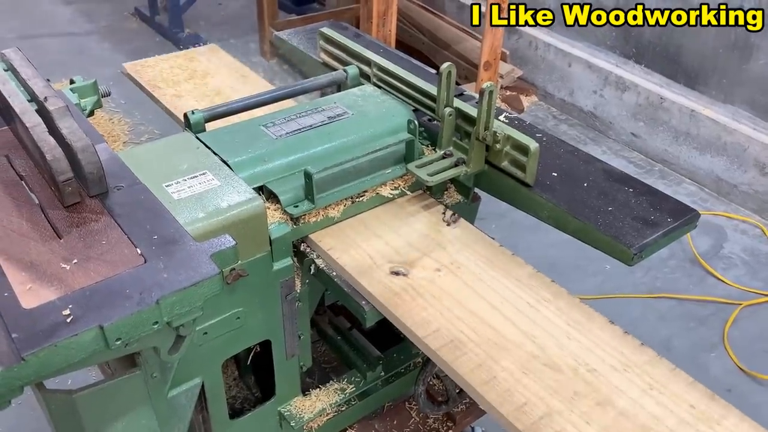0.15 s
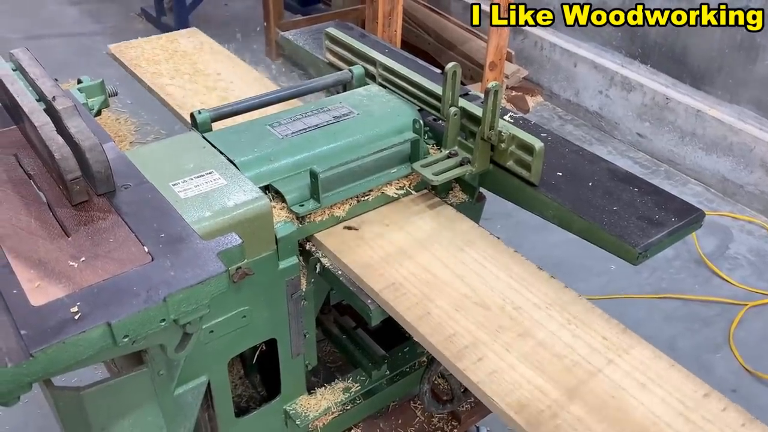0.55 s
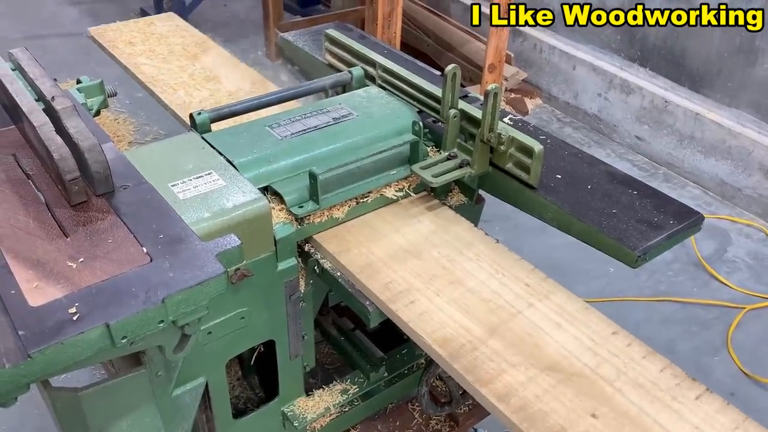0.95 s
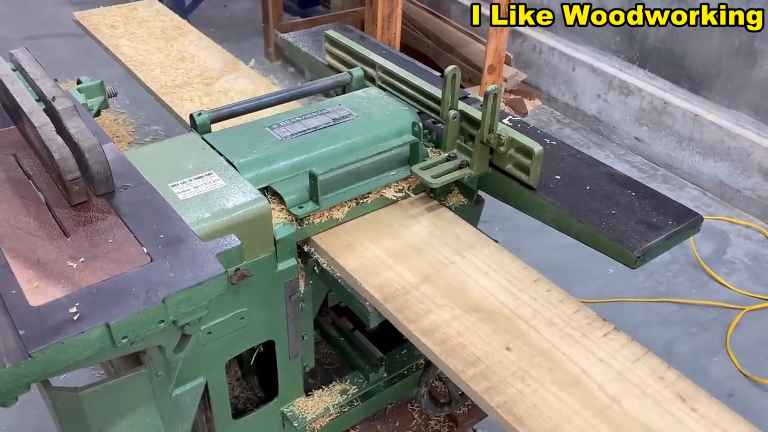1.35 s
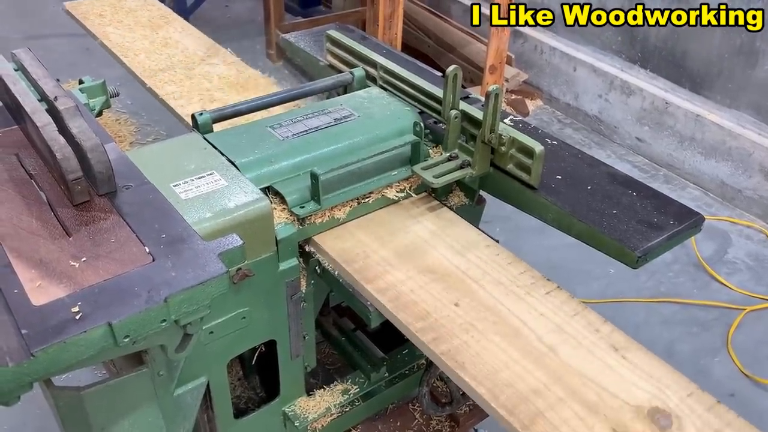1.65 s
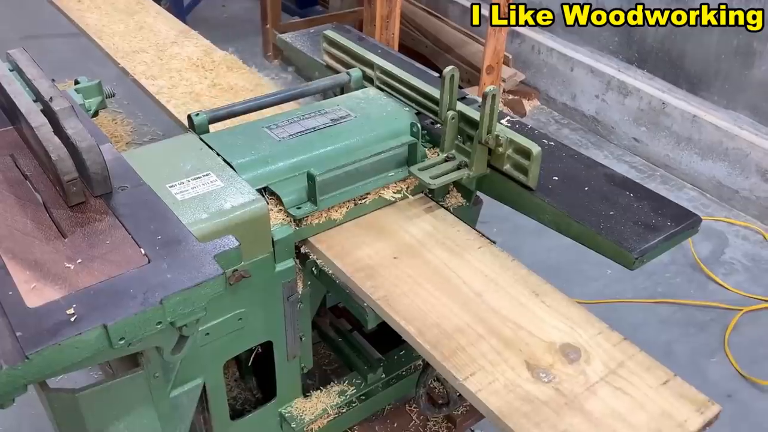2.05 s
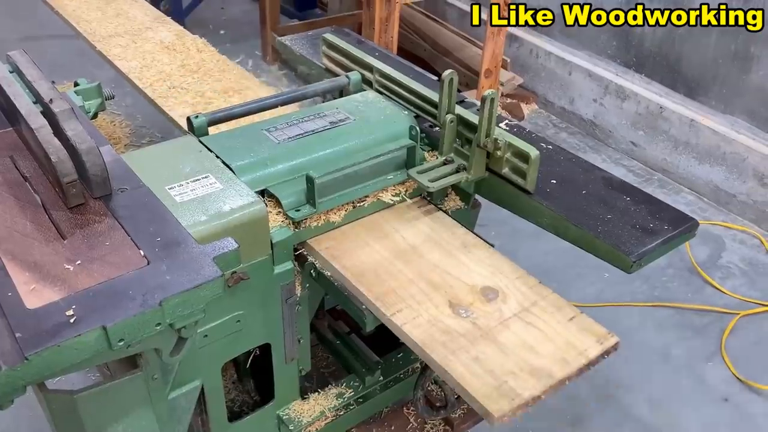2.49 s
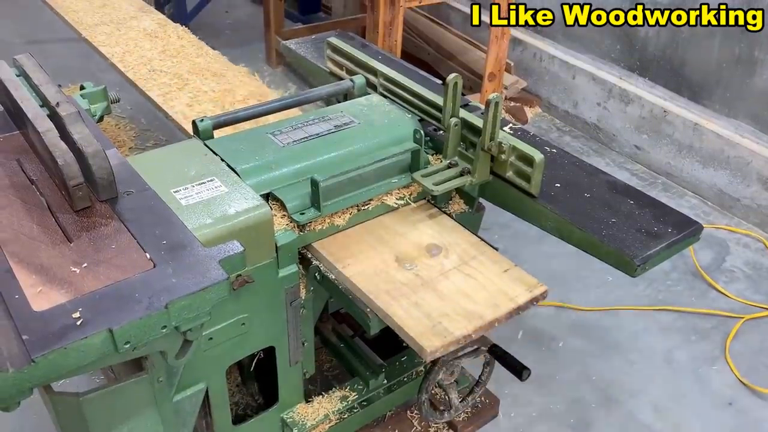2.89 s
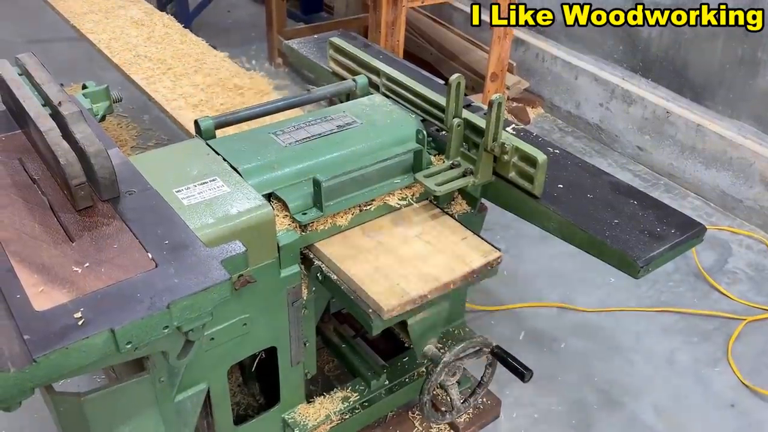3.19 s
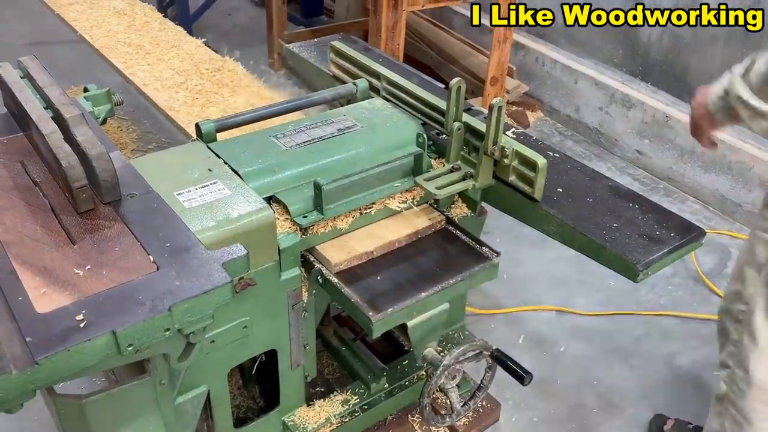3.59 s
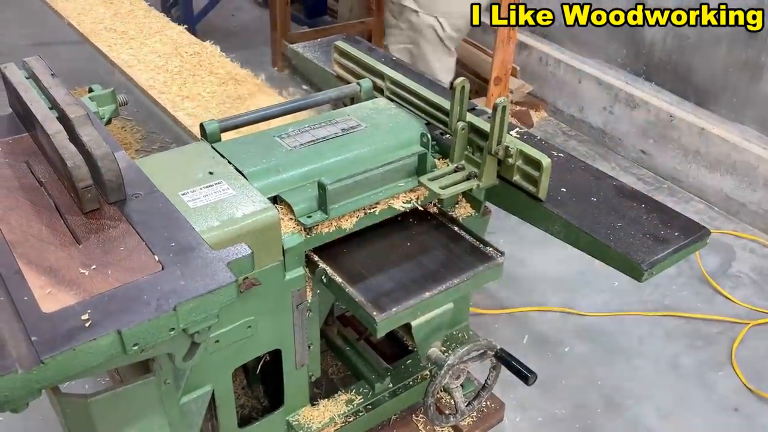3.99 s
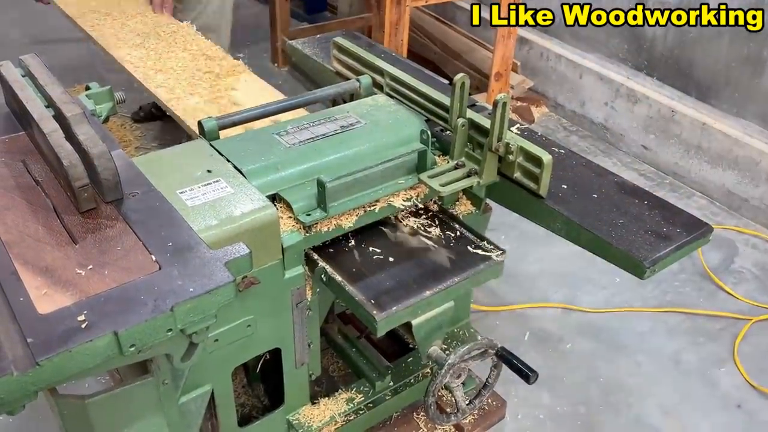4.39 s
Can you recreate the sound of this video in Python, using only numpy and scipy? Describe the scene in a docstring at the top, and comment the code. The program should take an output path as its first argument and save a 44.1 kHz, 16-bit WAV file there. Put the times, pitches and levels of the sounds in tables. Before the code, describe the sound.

A planer in an open shed is cutting a pine board from the first moment, heard in stereo through a microphone with thin bass. Knife strokes, over three hundred a second, fuse into a harsh, bright buzzing scream with a dense tearing hiss, above a steady whine near two kilohertz. From about 0.6 s feed rasp thickens the sound. Brightness and loudness keep shifting with the grain; brief gritty snarls come around 0.9 to 1.5 s, with stronger, sharper ones around 2.8 to 3.0 s and 3.7 to 4.2 s. Pitch sags slightly under load, and the shortening board sounds more ringing and uneven. A short dull wooden clack at 4.0 s is half buried in the noise. At about 4.24 s the cut stops abruptly, its faint shed echo dying quickly. The pitch jumps up slightly, and a much quieter whine with rushing cutterhead air carries on to the end.

```python
"""Pine board through a shed planer

An open shed, picked up by a microphone with two ports; distance enters only through the set levels.
Each knife stroke knocks the wood, and the knocks fuse into a comb of partials that fade in and out as the
board slides through. Filtered noise makes the hiss of torn fibre, the rasp of the feed and the air of the
cutterhead. Load sags the speed; when the board leaves, the shed's echo of the cut dies away, the speed
runs up, and the whine and air of the cutterhead remain."""
import sys
import numpy as np
from scipy import signal
from scipy.io import wavfile
from scipy.ndimage import uniform_filter1d

SR = 44100
rng = np.random.default_rng(int(sys.argv[2]) if len(sys.argv) > 2 else 0)


def persist_wave(psi):
    """Save psi, clipped to +-1, as 16-bit WAV."""
    counts = np.round(np.clip(psi, -1, 1) * 32767).astype(np.int16)
    wavfile.write(sys.argv[1], SR, np.atleast_2d(counts).T)


N = 200258
HOP = 256  # samples per control frame

# Speed of the cutterhead under load: (time [s], stroke rate [strokes/s])
LOADED_SPEED = [(0.0, 324.4), (0.06, 325.1), (0.19, 331.7), (0.27, 332.3), (0.68, 328.2), (0.91, 330.2),
                (0.97, 325.9), (1.31, 326.2), (1.54, 323.3), (1.68, 323.6), (1.97, 320.2), (2.38, 325.4),
                (2.73, 323.5), (3.06, 317.9), (3.32, 317.5), (3.47, 319.7), (3.65, 318.9), (3.74, 310.8),
                (3.8, 309.6), (3.92, 316.8), (3.99, 317.6), (4.13, 314.8), (4.21, 316.0)]
# The cut: (time [s], relative bite [dB], mid brightness [dB], top brightness [dB])
CUT_LEVELS = [(0, -36, -3, 0.5), (.1, -39.5, -4.5, 3), (.35, -38.5, 7, 4), (.69, -34.5, 0.5, 0.5),
              (.87, -31.5, 7, -3), (1.1, -30, -2, 1), (1.35, -29.5, 6, -2.5), (1.5, -33, 0.5, -1.5),
              (1.66, -33.5, 8, -1.5), (1.96, -29, -4, -4.5), (2.25, -36, 7, 0.5), (2.55, -33.5, 7, 0.5),
              (2.75, -33, 0, 4), (3.0, -33, 3.5, -6), (3.2, -32.5, 6.5, -5), (3.47, -35, 2.5, 0),
              (3.62, -33.5, -1, 0.5), (3.8, -31, 0.5, -8.5), (3.98, -35, 4.5, -4.5), (4.2, -31.5, -1, 0)]
# Whine of cutterhead and hood, multiples rounded in use:
# (multiple of stroke rate [1], mid-board level [dB], board-tail level [dB], free-running level [dB])
WHINE_LEVELS = [(1, -87.5, -84.5, -80), (2, -59, -51.5, -53.5), (4, -57, -54, -56.5),
                (6, -39, -44.5, -48.5), (7, -61.5, -59, -60), (8, -54, -40, -54.5), (9, -53, -55, -69),
                (10, -52, -50.5, -54), (12, -48.5, -41, -52), (13, -48.5, -47, -65), (14, -50.5, -40, -58),
                (14.95, -51, -50, -60), (16, -55.5, -40, -63.5), (17, -54.5, -60, -64),
                (18, -51.5, -43.5, -59), (19, -50, -43, -64), (20, -45, -47.5, -66), (21, -45.5, -54, -68),
                (26, -51.5, -48.5, -64)]
# Each whine partial between the ports, rows as above: (multiple [1], left lead [rad], left-right [dB])
WHINE_PORTS = [(1, 0.99, 1), (2, 1.43, -0.5), (4, -1.8, 0.5), (6, -0.097, -0.1), (7, 0.31, -2),
               (8, 0.93, -8), (9, 0.95, -3), (10, 0.7, 0), (12, 1.78, -1), (13, 0.72, 0.5), (14, 1.3, -0.5),
               (15, 1.3, -4), (16, 0.71, 1.5), (17, 1.2, 2), (18, 1.2, -2), (19, 1.8, -2.5), (20, 1.6, 1),
               (21, -0.48, 0), (26, -1, 3)]
# Knocks as the board radiates them: (frequency [Hz], relative level [dB])
BOARD_COLOUR = [(250, -23), (330, -36), (1000, -23), (1600, -25), (2300, -48), (2900, -2), (3550, -11),
                (4800, 1.5), (6500, 1.5), (9000, -2.5), (12000, 1), (15700, -5)]
# Hiss of the cut: (frequency [Hz], relative mid-board density [dB], relative board-tail density [dB])
FIBRE_COLOUR = [(2800, -54, -62), (3330, -39, -24), (4240, 0, -1.5), (4960, -0.5, 1), (6000, -0.5, -4),
                (7200, -4, -7.5), (9000, -4.5, -5), (10800, -9, -6), (12000, -4, -5.5), (15700, -3, -6)]
# Weak partials; the fifth sounds throughout, those above the tenth run free: (multiple [1], level [dB])
FREE_PARTIALS = [(5, -64), (22.5, -59), (23.5, -59), (24.5, -59)]
# Fuzzy tones of the housing:
# (frequency [Hz], nominal width [Hz], relative level [dB], start time [s], stop time [s])
HOUSING_TONES = [(3965, 30, -50, 0, 4.3), (3975, 70, -42, 4.2, 4.7), (1113, 6, -58, .55, 1.15),
                 (1113, 6, -59, 1.75, 2.45)]
# The two microphone ports: (frequency [Hz], left lead [rad], left-right [dB], likeness [0-1])
PORT_FIELD = [(312, 1.34, 4, 0), (1250, 0.38, -2, 0.27), (2430, 0.52, -0.5, 0.48), (4880, 1.43, -1.5, 0.78),
              (7500, -1.66, -0.5, 1), (11200, 0.48, -4.5, 0.03), (16200, -1.6, -2, 0.95)]
# Rasp of the board through the feed: (time [s], relative level [dB])
RASP_LEVEL = [(0.0, -49.5), (0.62, -40), (0.81, -41), (1.02, -38.5), (1.47, -40), (1.96, -38.5),
              (2.55, -38), (2.77, -38), (3.08, -38.5), (3.32, -38), (3.54, -36.5), (4.1, -35.5),
              (4.26, -37), (4.3, -49.5)]
# Colour of the rasp: (frequency [Hz], relative density [dB])
FEED_COLOUR = [(88, -91), (150, -77), (300, -55), (430, -20), (580, -11.5), (639, -14), (735, -19.5),
               (1500, -10), (1920, -8.5), (2700, -8), (3200, -6.5), (3400, -27), (3650, -23), (4200, -6),
               (5460, -48), (9240, -120)]
# Air beaten by the knives: (frequency [Hz], relative density [dB])
AIR_COLOUR = [(100, -15), (200, -15), (400, -12.5), (700, -10), (1000, -17.5), (1400, -8.5), (2000, -4.5),
              (3000, -5.5), (4000, 1), (5000, -3), (6000, -8), (8000, -6.5), (9500, -9), (15700, -15)]
# Change of the air noise during the cut: (frequency [Hz], change [dB])
AIR_DURING_CUT = [(250, -32), (420, -10.5), (800, -2), (2000, -4), (3000, -4), (3450, -5), (3800, -3.5),
                  (5000, -5)]
# Brightest ring as the board's free length changes: (time [s], centre [Hz], lift before ring share [dB])
BOARD_RING = [(0, 9000, 14), (.09, 8660, 13), (.32, 7200, 4.5), (.65, 11200, 4.5), (.8, 9250, -12),
              (.95, 6400, 9), (1.08, 11500, 3), (1.25, 13900, 0), (1.3, 6400, 4), (1.5, 6400, 1),
              (1.66, 9700, 2.5), (1.95, 7500, 8), (2.27, 8500, 2), (2.4, 9500, -14), (2.68, 11200, 1.5),
              (2.78, 9200, 4), (2.95, 8900, 2.5), (3.03, 7640, 2), (3.35, 7500, 6.5), (3.56, 9980, -2),
              (3.66, 7000, -2), (3.74, 7800, 7.5), (3.82, 7600, 6.5), (3.87, 10000, 5.5), (3.99, 9900, 1.5),
              (4.08, 7900, -1), (4.22, 9000, 8.5)]
# Hard grain under the knives: (time [s], change of bite [dB], decay length [s], added crispness [0-1])
HARD_GRAIN = [(0.586, 2.5, 0.15, 0), (0.918, 4, 0.054, 0.6), (1.15, 1.5, 0.037, 0),
              (1.306, -1, 0.087, 0.53), (1.54, 1.5, 0.013, 0.2), (2.457, 2.5, 0.029, 0.65),
              (2.687, 5, 0.02, 0), (2.85, 4, 0.21, 0.1), (3.125, 2, 0.047, 0.1), (3.69, 3, .04, 0),
              (3.76, 1, .04, 0), (3.87, 6, 0.14, 0), (3.998, 3.5, 0.022, .05), (4.118, 4, 0.012, 0.6),
              (4.217, 4, 0.016, .02)]
# The sixth partial about its usual strength: (time [s], level [dB])
SIXTH_LEVEL = [(0, -3.5), (.35, -0.5), (.5, -4), (.69, 2), (.93, -0.2), (1.77, 0.5), (2.0, -3.5),
               (2.33, 1.5), (2.93, 3.5), (3.26, -6.5), (3.43, 2), (3.64, 2.5), (3.69, -10), (3.81, 6.5),
               (3.88, -10), (4.0, -6), (4.04, 10), (4.21, 1), (4.27, 8), (4.32, -4), (4.4, 5.5),
               (4.54, -12)]
# The eighth partial about its usual strength: (time [s], level [dB])
EIGHTH_LEVEL = [(.07, -14), (.22, 4), (.4, 3.5), (.52, -7), (.67, -3), (.85, 1.5), (1.27, 6), (1.42, 1),
                (1.57, -13), (1.75, -6), (1.87, 3), (2.17, -1), (2.32, 6.5), (2.62, 5.5), (2.76, -5),
                (2.92, 1.5), (3.07, 3), (3.25, 0), (3.55, 0.5), (3.7, 4), (3.73, -2.5), (3.9, -0.5),
                (4.0, -4), (4.03, 7.5), (4.13, 9.5), (4.21, 5), (4.26, -4.5), (4.4, 6), (4.5, 6.5)]
# Swells and dips of single whine partials: (time [s], length [s], multiple [1], change [dB])
WHINE_SWELLS = [(0.093, 0.093, 2, 9.5), (0.704, 0.073, 2, 9), (.69, 0.033, 12, 2), (1.07, 0.23, 16, 8),
                (1.2, .2, 14, 7), (1.3, 0.33, 12, 10.5), (1.15, .2, 9, 2.5), (1.44, 0.39, 13, 7),
                (1.593, 0.43, 2, 17.5), (1.917, 0.11, 16, 15), (1.98, 0.32, 14, 16), (2.41, 0.12, 2, 8.5),
                (2.44, 0.21, 12, 12), (2.78, 0.23, 9, 10.5), (2.553, 0.04, 14, 7), (2.49, 0.71, 13, 7.5),
                (2.73, 0.29, 10, 8), (2.83, 0.19, 2, 8), (3.47, 0.35, 14, 5), (2.9, 0.12, 12, 4.5),
                (3.474, 0.023, 4, 7), (3.43, 0.13, 2, -34), (3.04, 0.26, 16, 3.5), (1.246, 0.19, 4, 4),
                (0.36, 0.12, 16, 6), (0.35, 0.071, 14, 8), (3.64, 0.065, 10, 11), (1.15, .1, 10, -9),
                (3.68, 0.098, 4, 10.5), (3.8, 0.096, 7, 11), (3.7, 0.063, 13, 13), (3.882, 0.066, 12, 7),
                (4.03, 0.22, 4, 10), (5.2, 0.033, 16, 8), (4.08, .08, 9, 5), (4.133, 0.02, 13, 14.5),
                (4.14, 0.026, 10, 11), (4.217, 0.036, 4, 7.5), (4.468, 0.084, 2, 11),
                (0.01, 0.038, 10, 7.5), (0.48, 0.29, 10, 6), (0.806, 0.062, 10, 5.5), (1.6, 0.25, 10, 7),
                (2.096, 0.21, 10, 9.5), (0.35, 0.09, 13, 6), (0.8, 0.22, 1, 22.5), (1.25, .08, 1, 12.5),
                (1.55, 0.046, 1, 16), (1.69, 0.034, 1, 17.5), (1.855, 0.13, 1, 17), (2.554, 0.22, 1, 21.5),
                (3.0, 0.11, 1, 12.5), (3.3, 0.068, 1, 14), (3.72, 0.17, 1, 18.5), (4.04, .08, 1, 18.5),
                (0.69, 0.48, 4, 7), (2.34, 0.2, 4, 5.5), (0.95, .08, 18, 11), (1.32, 0.16, 18, 20),
                (1.8, 0.074, 18, 14), (3.195, 0.11, 18, 8), (3.65, 0.052, 18, 11), (3.9, 0.05, 18, 10),
                (1.04, 0.089, 19, 12.5), (1.46, .05, 19, 9.5), (1.5, 0.05, 19, 11),
                (1.724, 0.053, 19, 13.5), (2.354, 0.25, 19, 1), (2.91, 0.19, 19, 10.5),
                (3.673, 0.044, 19, 7.5), (1.03, 0.12, 15, 10), (1.27, 0.079, 15, 6), (1.75, .06, 15, 2),
                (3.2, .15, 15, -8), (3.75, 0.093, 15, 11), (3.4, 0.11, 15, 7.5), (1.4, .08, 17, 7),
                (1.34, 0.069, 17, 12), (1.9, .06, 17, 6), (3.0, .08, 17, 5), (3.8, 0.11, 17, 6),
                (3.8, .04, 17, 16), (1.05, 0.097, 20, 11.5), (1.5, .06, 20, 8), (2.03, 0.11, 20, 6.5),
                (3.2, 0.19, 20, 2), (4.048, .07, 20, 6), (0.32, 0.089, 21, 4.5), (1.003, 0.16, 21, 1),
                (1.4, .06, 21, 8), (1.95, 0.16, 21, 10.5), (2.952, 0.17, 21, 16), (0.024, 0.048, 26, 16),
                (1.35, .05, 26, 1), (2.24, 0.19, 26, 14), (2.2, .06, 26, 1), (3.303, .12, 26, 2),
                (3.5, 0.087, 26, 7)]
# Strokes that bite squarely and snap as sharp clicks:
# (time [s], length [s], level per partial [dB], centre [Hz], width [Hz])
SHARP_STROKES = [(0.93, 0.02, -42, 7500, 3500), (0.957, .04, -38, 6300, 1500),
                 (1.01, 0.013, -43, 6500, 2500), (1.15, 0.075, -46, 6400, 900),
                 (1.31, 0.025, -41, 6000, 1200), (1.385, 0.045, -39.5, 6300, 1500),
                 (1.544, 0.011, -39, 5830, 1500), (2.793, .03, -39.5, 9000, 2000),
                 (2.78, .04, -45, 12900, 1500), (2.865, 0.044, -34, 8700, 1600),
                 (2.943, 0.05, -36, 9200, 1300), (2.95, 0.056, -42, 6540, 700),
                 (2.93, 0.034, -43, 12500, 1500), (2.965, .012, -47, 8500, 2500),
                 (3.103, .04, -44.5, 6000, 2000), (3.7, 0.02, -40, 4500, 900),
                 (3.64, 0.033, -42, 5700, 700), (3.778, .05, -35.5, 7700, 400),
                 (3.77, 0.045, -41, 5030, 1200), (3.9, 0.037, -40, 5700, 400),
                 (3.98, 0.026, -39, 10000, 500), (3.88, 0.034, -43, 9500, 1800),
                 (3.915, .012, -44, 7000, 3000), (4.02, 0.0065, -41, 6000, 3500),
                 (4.05, .01, -46, 8000, 3000), (4.11, 0.049, -38, 4970, 500), (4.17, 0.017, -43, 8800, 500),
                 (4.225, .012, -43, 9000, 1500)]

LEAVES_S = 4.235  # the board's end clears the knives
FREE_PER_S, UNLOAD_S, SPIN_UP_S = 341.8, 4.215, 0.026  # full stroke rate, start and time scale of run-up
TAIL_FROM_S, TAIL_TO_S = 2.4, 3.23  # the board's free end grows short; its sound changes over this span
GONE_DB_PER_S, SHED_DB, SHED_DB_PER_S = 1304, -20, 197  # the cut stops dead; the shed's echo lingers
KNOT_RISE_S = 0.0088
CRISP, CRISP_TAIL = 0.33, 0.15  # how squarely the knives meet plain grain, 0-1
ROUGH = .35  # share of flutter in the left port's knocks at all frequencies
ROUGH_TOP, ROUGH_TOP_HZ = .8, 11500  # added flutter in both ports, above this frequency
SHARED_FROM, SHARED_DB = 15, -7  # whine rows below this multiple replace the knock; others lie over it
WANDER_DB = 1.4  # slow wander of the whine partials other than the sixth and eighth
# unsteady share of a whine partial: up to the eighth, above it, running free, the lowest one
WAVER_MAIN, WAVER, WAVER_FREE, WAVER_LOWEST = 0.21, 0.36, .4, 1.85
OWN_SHARE = 0.53  # wavering of a partial above the eighth that each port hears alone
HISS_DB, HISS_TAIL_DB = -13, -7.5  # hiss against the bite, mid-board and tail
HISS_KNOT, HISS_RING = 0.91, .4  # share of the grain's lift kept out of the hiss; share of ring let in
AIR_DB = -57
SNAP_SMEAR = .005  # higher partials come a little late [rad per multiple squared]
SNAP_FLUTTER, SNAP_LAG = .3, 0.041  # unsteady share; lag of the right port's own echo [strokes]
JOLT_S = 4.012  # the board's end drops off the feed roller
JOLT_DB, JOLT_HZ, JOLT_T60_S = -31, 3200, .12
EDGE_HZ = 15730  # upper band limit


def amp(db):
    """Decibels to amplitude."""
    return 10 ** (np.asarray(db) / 20)


def evened(x):
    """Scale to an rms of 1."""
    return x / np.sqrt(np.mean(abs(x) ** 2) + 1e-20)


def ramp(t, start, stop):
    """Straight rise from 0 to 1."""
    return np.clip((t - start) / (stop - start), 0, 1)


def by_frequency(points, hz):
    """Columns of a table against log frequency."""
    f, *columns = np.transpose(points)
    return np.squeeze([np.interp(np.log(hz + 1), np.log(f + 1), c) for c in columns])


def over_time(rows, t):
    """Columns of a table against time."""
    s, *columns = np.transpose(rows)
    return np.squeeze([np.interp(t, s, c) for c in columns])


def drift(count, per_s):
    """Rows of slow complex chance at frame rate, rms 1 overall."""
    frames = N // HOP + 8
    chance = rng.standard_normal((frames, count, 2)) @ [1, 1j]
    f = np.fft.fftfreq(frames, HOP / SR)[:, None]
    slowed = np.fft.fft(chance, axis=0) / (1 + (f / per_s) ** 2)
    return evened(np.fft.ifft(slowed, axis=0)).T


def from_frames(values):
    """Frame-rate values drawn out to every sample."""
    return np.interp(np.arange(N) / HOP, np.arange(len(values)), values)


def ports(hz, near, other):
    """Two ports: the right hears partly the same field, with a phase lag and a level difference."""
    lead, balance_db, same = by_frequency(PORT_FIELD, hz)
    same = np.clip(same, 0, 1)
    right = (same * near + np.sqrt(1 - same ** 2) * other) * np.exp(-1j * lead)
    return np.array([near * amp(balance_db / 2), right * amp(-balance_db / 2)])


def hiss(level_db, patchy_db):
    """Noise from random short-time spectra with smooth patches; level_db gives bins by frames."""
    hz = np.fft.rfftfreq(4 * HOP, 1 / SR)[:, None]
    a, b, c, d, patches = rng.standard_normal((N // HOP + 8, len(hz), 5)).T
    patches = uniform_filter1d(uniform_filter1d(patches, size=8, axis=0), size=8, axis=1)
    patches = evened(patches)
    spectra = ports(hz[:, 0], (a + 1j * b).T, (c + 1j * d).T).transpose(0, 2, 1)
    spectra = spectra * amp(level_db(hz) + patchy_db * patches)
    return signal.istft(spectra, nperseg=4 * HOP, noverlap=3 * HOP)[1][:, :N]


def speed(t):
    """Stroke rate: sagging under load, then running up to full speed."""
    loaded = over_time(LOADED_SPEED, t)
    run_up = 1 - np.exp(-(np.maximum(t - UNLOAD_S, 0) / SPIN_UP_S) ** 2)
    return loaded + (FREE_PER_S - loaded) * run_up


def partials(turns, voices):
    """Sum multiples of the stroke rate; voices maps a multiple to its complex size per port and frame."""
    out = np.zeros((2, N))
    for k, sizes in voices.items():
        wheel = np.exp(2j * np.pi * k * turns)
        for port, size in zip(out, sizes):
            port += np.sqrt(2) * (from_frames(size) * wheel).real
    return out


def per_stroke(turns, spread_db):
    """A random gain for every knife stroke: the grain is never twice the same."""
    gain = amp(spread_db * rng.standard_normal(int(turns[-1]) + 2))
    return evened(uniform_filter1d(gain[(turns + .1).astype(int)], size=9))


def knots(t):
    """Hard patches come on quickly and die away: summed change in dB and added crispness."""
    s, lift_db, length, crisp = np.transpose(HARD_GRAIN)[:, :, None]
    rise = np.exp(-((t - s) / KNOT_RISE_S) ** 2)
    fall = np.exp(-((t - s) / length) ** 2)
    shape = np.where(t < s, rise, fall)
    return (lift_db * shape).sum(0), (crisp * shape).sum(0)


def bite_db(hz, t, ring_share=1):
    """Level of the cut: bite, two brightness bands and the board's ring, falling once the board leaves."""
    def over(edge_hz):
        return 1 / (1 + (edge_hz / (hz + 1)) ** 12)

    bite, mid_db, top_db = over_time(CUT_LEVELS, t)
    brightness_db = mid_db * (over(7470) - over(11030)) + top_db * over(10200)
    ring_hz, lift_db = over_time(BOARD_RING, t)
    ring_db = lift_db * np.exp(-((hz - ring_hz) / 900) ** 2)
    after = np.maximum(t - LEAVES_S, 0)
    gone_db = np.maximum(-GONE_DB_PER_S * after, SHED_DB - SHED_DB_PER_S * after)
    return bite + knots(t)[0] + brightness_db + ring_share * ring_db + gone_db


def echoes(t, count, per_s):
    """One stroke period as drifting echoes, a short burst then the board's ring; as partial sizes."""
    plain = CRISP + (CRISP_TAIL - CRISP) * ramp(t, TAIL_FROM_S, TAIL_TO_S)
    crisp = np.clip((plain + knots(t)[1]) ** 2.5, 0, .98)
    delay = np.arange(count)[:, None] / count  # in strokes
    burst, ring = np.exp(-delay / .06), np.exp(-delay / .8)
    shape = crisp * evened(burst) + np.sqrt(1 - crisp ** 2) * evened(ring)
    return np.fft.fft(drift(count, per_s) * shape / np.linalg.norm(shape, axis=0), axis=0)


def knocks(t, count=49):
    """Every stroke rings the board a little differently as it feeds; grain makes the partials flutter."""
    left, right, flutter = echoes(t, count, 3.6), echoes(t, count, 3.6), echoes(t, count, 30.0)
    whining = {round(row[0]) for row in WHINE_LEVELS}
    replaced = {round(row[0]) for row in WHINE_LEVELS if row[0] < SHARED_FROM}
    voices = {}
    for k in set(range(1, count)) - replaced:
        hz = k * speed(t)
        top = ROUGH_TOP / (1 + (ROUGH_TOP_HZ / hz) ** 8)
        db = by_frequency(BOARD_COLOUR, hz) + bite_db(hz, t) + SHARED_DB * (k in whining) - 12.5
        near = left[k] + (ROUGH + top) * flutter[k]
        other = right[k] + top * flutter[-k]
        voices[k] = amp(db) * ports(hz, near, other)
    return voices


def whine(t):
    """Strong partials of the cutterhead and hood, and weak free-running ones, each wavering."""
    waver = drift(len(WHINE_LEVELS) + len(FREE_PARTIALS), 8.0)
    wander = drift(len(WHINE_LEVELS), 2.5).real * np.sqrt(2)
    own = drift(2 * len(WHINE_LEVELS), 10.0).reshape(len(WHINE_LEVELS), 2, -1)
    fuzz = drift(2, 22.0)
    tail = ramp(t, TAIL_FROM_S, TAIL_TO_S)
    free = ramp(t, LEAVES_S - .025, LEAVES_S + 0.037)
    voices = {}
    for levels, place, w, slow, apart in zip(WHINE_LEVELS, WHINE_PORTS, waver, wander, own):
        k, board_db, tail_db, free_db = levels
        k = round(k)
        _, lead, balance_db = place
        sides = amp([[balance_db / 2], [-balance_db / 2]]) * np.exp([[0], [-1j * lead]])
        db = board_db + (tail_db - board_db) * tail + (free_db - tail_db) * free
        for s, length, multiple, change_db in WHINE_SWELLS:
            if round(multiple) == k:
                db = db + change_db * np.exp(-((t - s) / length) ** 2)
        if k == 6:
            db = db + over_time(SIXTH_LEVEL, t)
        elif k == 8:
            db = db + over_time(EIGHTH_LEVEL, t)
        else:
            db = db + WANDER_DB * slow
        cutting = WAVER_MAIN if k <= 8 else WAVER
        unsteady = (cutting + (WAVER_FREE - cutting) * free) * w + OWN_SHARE * (k > 8) * apart
        if k == 1:
            unsteady = WAVER_LOWEST * fuzz
        voices[k] = sides * amp(db) * (1 + unsteady)
    for (k, db), w in zip(FREE_PARTIALS, waver[len(WHINE_LEVELS):]):
        present = free if k > 10 else 1
        voices[k] = amp(db) * present * ports(k * speed(t), 1 + 0.71 * w, w[::-1])
    return voices


def fibre(t, turns):
    """Torn fibre hisses with the bite and puffs at each stroke, some strokes tearing harder."""
    puff = evened(4.0 + per_stroke(turns, spread_db=2.0) * np.exp(-(turns % 1) / 0.16))
    tail = ramp(t, TAIL_FROM_S, TAIL_TO_S)
    above_db = HISS_DB + (HISS_TAIL_DB - HISS_DB) * tail - HISS_KNOT * knots(t)[0]

    def level_db(hz):
        board_db, tail_db = by_frequency(FIBRE_COLOUR, hz[:, 0])[:, :, None]
        colour_db = board_db + (tail_db - board_db) * tail
        return colour_db + bite_db(hz, t, HISS_RING) + above_db - 11.0
    return puff * hiss(level_db, patchy_db=3.5)


def rasp(t):
    """The board rubs through rollers and bed, making coloured noise until it leaves."""
    gone_db = -400 * np.maximum(t - RASP_LEVEL[-1][0], 0)
    rubbing_db = over_time(RASP_LEVEL, t) + gone_db - 15.5
    return hiss(lambda hz: by_frequency(FEED_COLOUR, hz[:, 0])[:, None] + rubbing_db, patchy_db=3.5)


def air(t):
    """Wind of the cutterhead as noise, thinner and shorter of bass during the cut."""
    during_cut = 1 - ramp(t, LEAVES_S - .015, LEAVES_S + .015)

    def level_db(hz):
        free_db = AIR_DB + by_frequency(AIR_COLOUR, hz[:, 0])[:, None]
        return free_db + by_frequency(AIR_DURING_CUT, hz[:, 0])[:, None] * during_cut
    return hiss(level_db, patchy_db=2.5)


def housing_tones():
    """Fuzzy tones of the housing: carriers whose size and phase drift at random."""
    t = np.arange(N) / SR
    out = np.zeros((2, N))
    for hz, width, db, start, stop in HOUSING_TONES:
        on = np.clip(np.minimum(t - start, stop - t) / .1, 0, 1)
        carrier = np.exp(2j * np.pi * hz * t)
        for port, size in zip(out, ports(hz, *drift(2, width / 2))):
            port += amp(db) * on * (from_frames(size) * carrier).real
    return out


def snaps(t, count=49):
    """Partials in step make one sharp click per stroke, coloured by the band each patch of grain rings in."""
    s, length, db, centre_hz, width_hz = np.transpose(SHARP_STROKES)[:, :, None]
    swell = amp(db) * np.exp(-((t - s) / length) ** 2)
    flutter = drift(count, 25.0)
    voices = {}
    for k in range(12, count):
        hz = k * speed(t)
        size = (1 + SNAP_FLUTTER * flutter[k]) * np.exp(-1j * SNAP_SMEAR * k ** 2)
        lagged = size * np.exp(-2j * np.pi * k * SNAP_LAG)
        colour = (swell * np.exp(-((hz - centre_hz) / width_hz) ** 2)).sum(0)
        voices[k] = colour * ports(hz, size, lagged)
    return voices


def jolt():
    """A short dull clack of wood on the bed: a decaying burst of band-shaped noise."""
    t = np.arange(N) / SR - JOLT_S
    shape = ramp(t, 0, 0.0032) * amp(JOLT_DB - 60 * np.maximum(t, 0) / JOLT_T60_S)
    return shape * evened(hiss(lambda hz: -12 * np.log2((hz + 1) / JOLT_HZ) ** 2, patchy_db=1.5))


def scene():
    """All layers at the two ports, sharing one count of knife strokes."""
    t = np.arange(N // HOP + 8) * HOP / SR  # frame times
    turns = np.cumsum(speed(np.arange(N) / SR)) / SR  # strokes so far
    knocking = partials(turns, knocks(t)) * per_stroke(turns, spread_db=1.0)
    whining = partials(turns, whine(t))
    cutterhead_air = air(t) + housing_tones()
    snapping = partials(turns, snaps(t)) * per_stroke(turns, spread_db=1.9)
    return knocking + whining + fibre(t, turns) + rasp(t) + cutterhead_air + snapping + jolt()


def record(dry):
    """The microphone drops the bass; then the band limit cuts the top."""
    thin = signal.sosfilt(signal.butter(4, 200, "highpass", fs=SR, output="sos"), dry)
    band_limit = signal.firwin(1023, EDGE_HZ, window=("kaiser", 9), fs=SR)
    return signal.oaconvolve(thin, band_limit[None], "same")


dry = scene()
out = record(dry)
persist_wave(out)
```